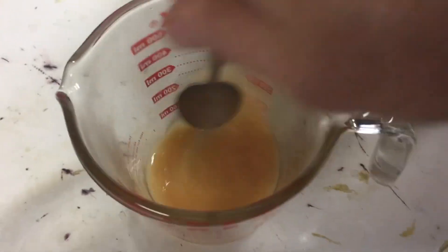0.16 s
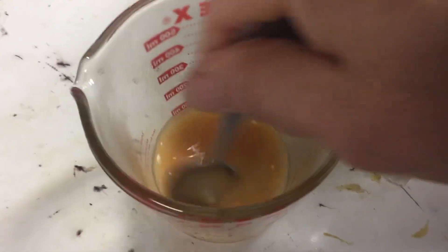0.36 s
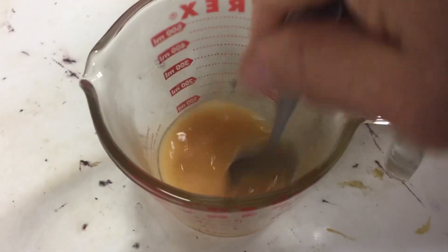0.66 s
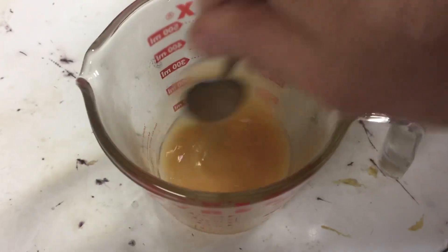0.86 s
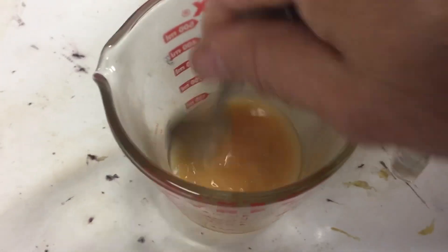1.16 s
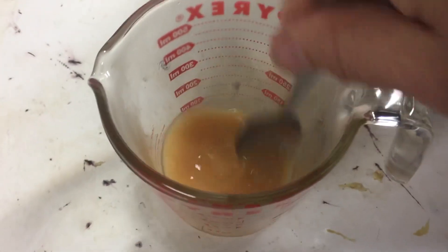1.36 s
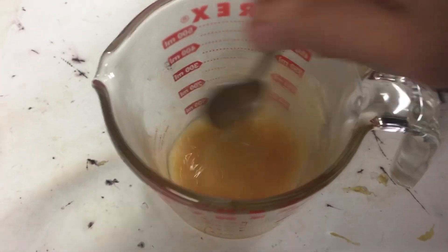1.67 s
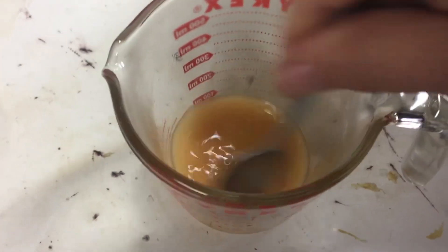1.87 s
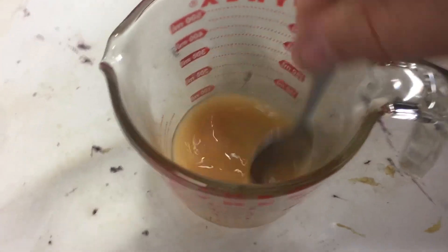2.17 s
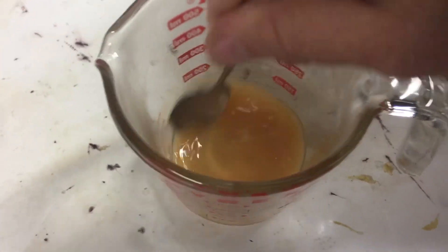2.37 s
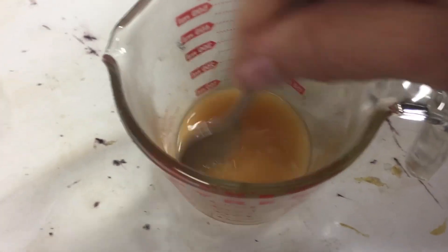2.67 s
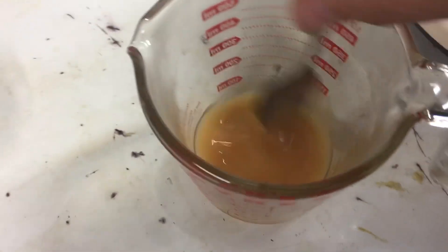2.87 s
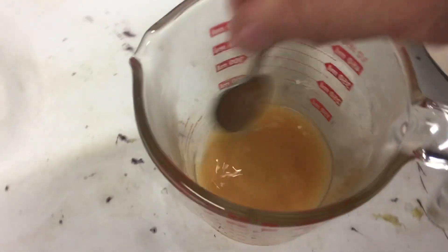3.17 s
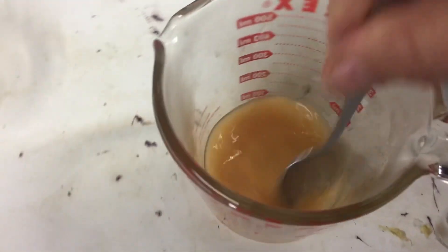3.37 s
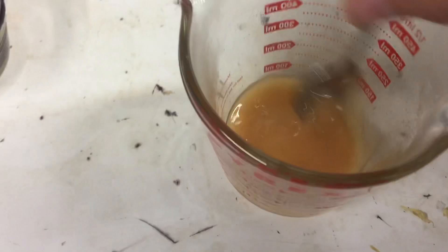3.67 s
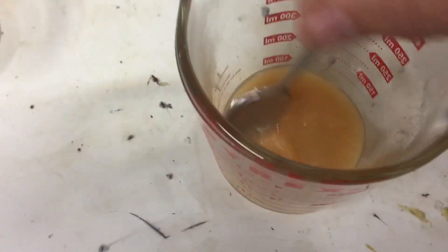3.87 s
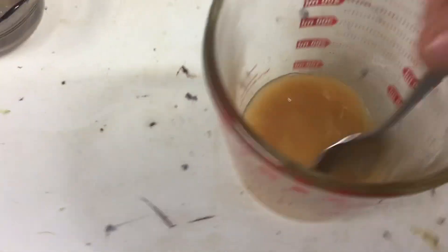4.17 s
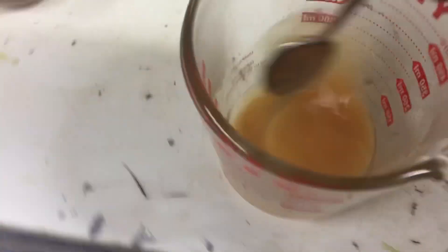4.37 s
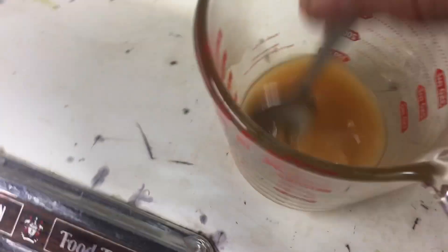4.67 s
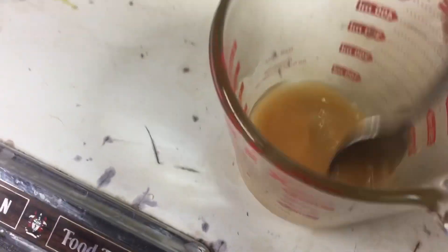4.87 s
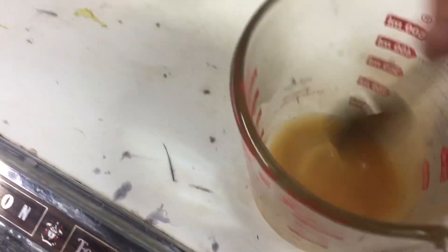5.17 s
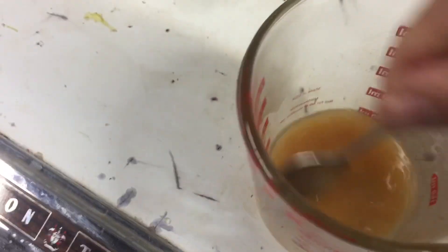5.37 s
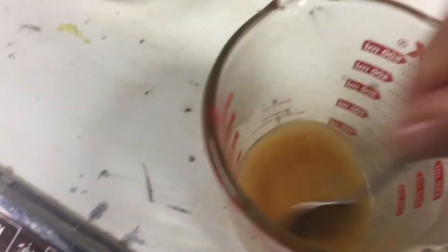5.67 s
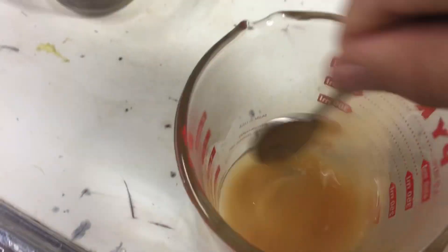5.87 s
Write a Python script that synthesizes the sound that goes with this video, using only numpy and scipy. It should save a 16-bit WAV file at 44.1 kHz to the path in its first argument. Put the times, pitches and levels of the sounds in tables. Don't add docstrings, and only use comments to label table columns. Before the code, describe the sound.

Fast, uneven spoon knocks rattle around a glass measuring cup holding a little syrupy liquid, with short rings, gritty scrapes and faint bubble pops.

```python
import sys
import numpy as np
from scipy import signal
from scipy.fft import rfft, irfft
from scipy.io import wavfile
from scipy.ndimage import uniform_filter1d, map_coordinates

SR = 44100
rng = np.random.default_rng(int(sys.argv[2]) if len(sys.argv) > 2 else 0)


def field_ratio(decibels):
    return 10 ** (np.asarray(decibels, dtype=float) / 20)


def persist_wave(psi):
    counts = np.round(np.clip(psi, -1, 1) * 32767).astype(np.int16)
    wavfile.write(sys.argv[1], SR, np.atleast_2d(counts).T)


N = 265031

# (pitch [Hz], level against the knock, above 4500 Hz against its crack [dB])
MODES = [(1175, -50), (1292, -45), (1701, -42), (2250, -38), (3163, -38), (3680, -39), (4190, -41),
         (4982, -30), (6205, -31), (7262, -28), (7472, -26), (7810, -26), (8025, -26), (9605, -32),
         (10468, -30), (11300, -32), (12670, -35), (14200, -32), (14578, -32)]
# (time [s], peak [dB], clunk pitch [Hz], crack against peak [dB], time for the clunk to fall 60 dB [s])
FAR_WALL = [(0.0348, 1.5, 2770, -20.5, 0.027), (0.416, 3.5, 2890, -26, 0.0086),
            (0.7972, -11.5, 3250, -20.5, 0.046), (1.1341, 3, 2660, -15.5, 0.015),
            (1.5331, 4.5, 2750, -17.5, 0.01), (1.919, -1.5, 3080, -23, 0.026),
            (2.2951, 4, 2900, -17, 0.019), (2.6537, 4, 3270, -23.5, 0.019),
            (3.1218, -45, 2500, -5.5, 0.028), (3.4162, -4, 2950, -16, 0.033),
            (3.7838, -26.5, 2660, -20, 0.069), (4.2493, -11.5, 3070, -12.5, 0.045),
            (4.6352, -8.5, 2690, -16, 0.048), (4.9831, -5.5, 2730, -6, 0.051),
            (5.3563, 0.5, 3440, -12, 0.019), (5.7392, 4, 3260, -8.5, 0.023)]
SIDE_WALL = [(0.0956, -2, 3107, -8, 0.043), (0.4777, -2, 3580, -11, 0.021), (0.8469, 3.5, 2964, -14, 0.015),
             (1.219, 2.5, 3340, -11.5, 0.015), (1.6154, -2.5, 2290, -4.5, 0.037),
             (2.014, 2, 2450, -4.5, 0.038), (2.353, 1, 3150, -6.5, 0.03), (2.7307, 3.5, 3040, -11.5, 0.024),
             (3.145, 3, 2610, -5, 0.07), (3.5197, 2, 2435, -8.5, 0.029), (3.9563, 7.5, 2533, -10.5, 0.025),
             (4.3286, -1, 3006, -4.5, 0.047), (4.6863, 2.5, 2910, -10, 0.026),
             (5.064, -2.5, 3430, -18, 0.017), (5.4224, 2.5, 4360, -18.5, 0.0064),
             (5.8, -6, 2860, -12, 0.031)]
BOTTOM = [(0.2632, -39, 3160, -27.5, 0.032), (0.641, -7.5, 2550, -18.5, 0.01),
          (0.9549, -4.5, 1900, -15, 0.0056), (1.31, -3, 3170, -20.5, 0.014),
          (1.7607, -7, 2870, -20.5, 0.032), (2.1414, -7, 2370, -18.5, 0.017),
          (2.528, -4.5, 2560, -6.5, 0.05), (2.933, -15, 2900, -27, 0.0092), (3.2467, -30, 1980, -4, 0.051),
          (3.6746, -1.5, 3240, -19, 0.0071), (4.0719, -4, 3070, -18.5, 0.0062),
          (4.488, -4.5, 3280, -16.5, 0.023), (4.8338, 4, 2510, -6, 0.031),
          (5.1986, -13, 1860, -32.5, 0.0041), (5.575, -4, 3770, -15.5, 0.0097),
          (5.9206, -3, 3220, -14.5, 0.01)]


def rms_one(x):
    return x / np.sqrt(np.mean(x ** 2) + 1e-20)


def in_time(rows):
    s, *columns = np.transpose(rows)
    return [np.interp(np.arange(N) / SR, s, column) for column in columns]


def drift(rate):
    knots = rng.standard_normal(4000)
    return map_coordinates(knots, [np.arange(N) * 2 * rate / SR], order=3)


def shaped(spectrum):
    hz, level_db = np.transpose(spectrum)
    grid = np.fft.rfftfreq(N, 1 / SR) + 1
    gain = field_ratio(np.interp(np.log(grid), np.log(hz), level_db, left=-90, right=-90))
    return rms_one(irfft(rfft(rng.standard_normal(N)) * gain, N))


def ring(force, hz, t60):
    r, w = field_ratio(-60 / (t60 * SR)), 2 * np.pi * hz / SR
    return signal.lfilter([0, np.sin(w)], [1, -2 * r * np.cos(w), r * r], force + 1e-18)


def cluster(hz, level_db, t60, t):
    t = t[:, None]
    x = np.sum(field_ratio(level_db - 60 * t / t60) * np.sin(2 * np.pi * hz * t), axis=1)
    return x / np.abs(x).max()


def lifetime(hz):
    sunk = .7 if 2000 < hz < 2500 else 1
    return max(.29 * (hz / 1700) ** -.62, .125) * sunk


def all_knocks():
    # (first [Hz], second [Hz], second against first [dB], third [Hz], third against first [dB])
    far_tones = [(2850.0, 2540.0, -2, 3080.0, -8), (2860.0, 2490.0, -5, 3110.0, -5),
                 (3030.0, 2630.0, -5, 1510.0, -8), (2630.0, 3410.0, -1, 1670.0, -5),
                 (2680.0, 2990.0, -4, 3420.0, -5), (3050.0, 1520.0, -11, 3540.0, -13),
                 (2900.0, 3480.0, -2, 3120.0, -3), (2950.0, 3450.0, 0, 3190.0, -4),
                 (2440.0, 2720.0, -3, 2120.0, -6), (2940.0, 2680.0, -8, 3950.0, -7),
                 (2680.0, 2130.0, -6, 4180.0, -8), (3010.0, 2580.0, -4, 1780.0, -9),
                 (2920.0, 2350.0, -6, 1810.0, -10), (2860.0, 1880.0, -9, 1620.0, -6),
                 (3210.0, 2290.0, -5, 2910.0, -6), (2520.0, 3950.0, -1, 2770.0, -1)]
    side_tones = [(3030.0, 2240.0, -4, 1840.0, -4), (3550.0, 2220.0, -2, 3020.0, -2),
                  (2930.0, 3600.0, -6, 3290.0, -7), (3000.0, 3540.0, 0, 3320.0, -4),
                  (2190.0, 3660.0, -5, 2900.0, -6), (2510.0, 3680.0, -4, 2190.0, -4),
                  (3070.0, 3700.0, -3, 2830.0, -5), (2830.0, 3060.0, -2, 2190.0, -3),
                  (2580.0, 2310.0, -7, 3690.0, -13), (2610.0, 2940.0, -3, 1500.0, -4),
                  (2520.0, 2260.0, -2, 2750.0, -4), (2410.0, 3170.0, 0, 1860.0, -4),
                  (2840.0, 3190.0, -1, 3540.0, -1), (3490.0, 2850.0, -3, 3170.0, -3),
                  (2660.0, 4160.0, -1, 3670.0, -1), (2960.0, 1600.0, -1, 2400.0, -6)]
    bottom_tones = [(3260.0, 1330.0, -1, 2570.0, -1), (2520.0, 2830.0, -7, 3150.0, -9),
                    (2780.0, 1680.0, -1, 1960.0, -4), (2780.0, 3960.0, -4, 3150.0, -5),
                    (2890.0, 3180.0, -5, 2490.0, -11), (2540.0, 1880.0, -2, 3260.0, -3),
                    (2450.0, 3240.0, -1, 2230.0, -7), (3210.0, 2520.0, 0, 3800.0, -4),
                    (1710.0, 2200.0, -2, 4550.0, -5), (2750.0, 3950.0, -5, 1810.0, -5),
                    (2960.0, 2530.0, -2, 2050.0, -5), (3180.0, 4050.0, -8, 2960.0, -8),
                    (2470.0, 3270.0, -2, 2980.0, -5), (2470.0, 1860.0, 0, 3390.0, -1),
                    (3280.0, 1920.0, -1, 3810.0, -3), (3050.0, 2740.0, -1, 3390.0, -2)]
    # (time [s], peak
    # [dB], clunk pitch [Hz], crack against peak [dB])
    grazes = [(0.0383, -16.5, 2700, -28.5), (0.6061, -16.5, 1930, -34), (0.985, -5, 2730, -32),
              (1.117, -25, 2040, -19), (1.3716, -10.5, 2580, -26.5), (1.518, -18.5, 3090, -29.5),
              (1.6916, -33.5, 1330, -24), (1.705, -25.5, 1610, -29.5), (1.8918, -30.5, 2820, -8),
              (1.989, -23, 3320, -25.5), (2.0385, -12.5, 1960, -25), (2.1502, -11, 2890, -13.5),
              (3.2905, -49.5, 1730, 9), (3.663, -41.5, 3520, -17.5), (5.332, -28, 3480, -28),
              (5.909, -34, 2170, -32), (3.9333, -34.5, 2400, -8.5), (4.1983, -31, 2130, -10.5),
              (4.2135, -17, 3050, -17), (4.2572, -6.5, 2880, -59), (4.454, -12, 2320, -58.5),
              (4.8055, -31.5, 1720, -9.5), (4.8435, -6, 2940, -35.5), (4.8512, 0, 3050, -14),
              (4.966, -27, 1620, -24.5), (5.0704, -5, 3380, -33.5), (5.0955, -7.5, 2960, -11.5),
              (5.1868, -28, 1820, -55), (5.34, -28, 1820, -28), (5.5642, -23, 1720, -32),
              (5.722, -20, 3220, -17)]
    ticks = [(0.2976, -49.5, 2610, -5.5), (0.3356, -40.5, 2820, -43), (0.359, -36, 2840, -33),
             (0.742, -29.5, 3020, -37), (0.8091, -38, 1500, -1.5), (1.0745, -49.5, 1710, 4.5),
             (1.8667, -35, 2030, -16), (2.1964, -53.5, 1680, 10.5), (3.3672, -45, 1700, 1.5),
             (3.7174, -28, 1970, -38), (3.8696, -48, 1940, -17), (4.1609, -42, 3200, 1.5),
             (5.241, -33, 3070, -9), (5.691, -36.5, 2760, -8), (5.9793, -34, 3280, -17)]
    rows = []
    for table, tones, hollow_db in ((FAR_WALL, far_tones, -29.5), (SIDE_WALL, side_tones, -35),
                                    (BOTTOM, bottom_tones, -18)):
        for (s, peak_db, hz, crack_db, t60), three in zip(table, tones):
            rows.append((s, peak_db, hz, crack_db, hollow_db, t60, *three))
    for s, peak_db, hz, crack_db in list(grazes) + list(ticks):
        rows.append((s, peak_db, hz, crack_db, -22, .018, hz, 1.13 * hz, -7, .85 * hz, -9))
    return np.array(rows)


def knock_samples(rows):
    return (rows[:, 0] * SR).astype(int)


def room_rumble():
    # (pitch [Hz], level per Hz [dB])
    rumble = [(25, -27), (60, -2.5), (105, 7), (150, -3.5), (200, 4.5), (300, -4), (520, -10.5), (800, -48)]
    fade_db = .35 * (-1 - np.arange(N) / SR)
    return field_ratio(-56 + fade_db + 2.2 * drift(4)) * shaped(rumble)


def gritty(grain_db):
    return rms_one(rng.standard_normal(N) * field_ratio(grain_db * drift(130) + drift(2.5)))


def scrape(pitches_hz, t60, patchy_db):
    force = gritty(grain_db=4.5)
    x = np.zeros(N)
    for k, hz in enumerate(pitches_hz):
        x += field_ratio(patchy_db * drift(7)) * ring(force, hz, t60) * (-1) ** k
    return x / np.sqrt(uniform_filter1d(x ** 2, size=3000) + 1e-12)


def wet_rubbing():
    # (pitch [Hz], level per Hz [dB])
    haze_spectrum = [(900, -22), (1350, -5), (2500, 0), (4100, -6), (5000, -16)]
    return scrape(np.geomspace(1301, 4050, num=14), 0.031, patchy_db=8.5), shaped(haze_spectrum)


def bare_rubbing():
    # (pitch [Hz], level per Hz [dB])
    hiss_spectrum = [(4200, 0), (5800, -5), (7800, 1), (10000, -6), (15700, -9)]
    bare = scrape([hz for hz, _ in MODES if hz > 4500], 0.04, patchy_db=9.0)
    low_pass = signal.butter(6, 14800, fs=SR, output="sos")
    return bare, signal.sosfilt(low_pass, shaped(hiss_spectrum))


def sliding():
    # (place [0 far wall, 1 side wall, 2 bottom, 3 far wall again], body [dB], hiss [dB])
    sweep = [
        (0, -56.5, -65),
        (.85, -46, -80.5),
        (1.5, -47.5, -65.5),
        (1.9, -53.5, -71.5),
        (2.1, -48.5, -71.5),
        (2.55, -52, -50),
        (2.898, -48, -57.5),
        (3, -41, -81.5),
    ]
    # (time [s], pressure [dB], hiss [dB])
    pressure = [(0, -5, -8), (.35, 3, -1.5), (.7, -7.5, -11), (1.05, 4, -10), (1.3, -5, -10.5),
                (1.65, 7.5, 1.5), (2, -1.5, -9.5), (2.35, -0.5, -12.5), (2.65, 0.5, -4), (2.95, -0.5, 2),
                (3.3, -7, -11), (3.6, 2.5, 5.5), (4.05, -2.5, -14), (4.3, 4, 2), (4.75, 6.5, -8),
                (5.27, -1, 1), (5.45, 0.5, 1), (6.01, 6, 1.5)]
    turn_s = 0.36
    s = np.transpose([np.array(table)[:, 0] for table in (FAR_WALL, SIDE_WALL, BOTTOM)]).ravel()
    s = np.r_[s[2] - turn_s, s, s[-3] + turn_s]
    place = np.interp(np.arange(N) / SR, s, np.arange(len(s)) - 1) % 3
    spot, body_db, hiss_db = np.transpose(sweep)
    pressure_db, bare_db = in_time(pressure)
    return np.interp(place, spot, body_db) + pressure_db, np.interp(place, spot, hiss_db) + bare_db


def slide(body_db, hiss_db, wet, haze, bare, air):
    body = field_ratio(1.5) * wet + field_ratio(-12.5) * haze
    hiss = field_ratio(-10.5) * bare + field_ratio(-11.0) * air
    skips = field_ratio(3.6 * drift(11))
    return skips * (field_ratio(body_db - 2.5) * body + field_ratio(hiss_db + 3.5) * hiss)


def slosh():
    # (time [s], level [dB])
    swirl = [
        (0, -67),
        (3.35, -68),
        (3.55, -42),
        (3.7, -47.5),
        (3.85, -55),
        (4.2, -57.5),
        (4.8, -52),
        (5.2, -59.5),
        (6.01, -53),
    ]
    level_db, = in_time(swirl)
    wet = scrape(np.geomspace(520, 860, num=14), .02, patchy_db=2.5)
    return field_ratio(level_db - 3 + 3 * drift(14)) * wet


def knocks():
    length = 4000
    out, t = np.zeros(N + length), np.arange(length) / SR
    chance = rng.standard_normal
    for s, peak_db, hz, bright_db, hollow_db, t60, *tones in all_knocks():
        first_hz, second_hz, second_db, third_hz, third_db = tones
        offset = .25 * chance(6)
        fill_db = -10 + 3 * chance(6) - 25 * abs(offset)
        body_hz = np.r_[first_hz, second_hz, third_hz, hz * np.exp(offset)]
        body_t60 = np.clip(t60, .012, .1) * np.exp(.15 * chance(9))
        body = cluster(body_hz, np.r_[0, second_db, third_db, fill_db], body_t60, t)
        after_hz = np.geomspace(1400, 4500, 24) * np.exp(.025 * chance(24))
        body += field_ratio(-13) * cluster(after_hz, 6 * chance(24), 0.077 * np.exp(.2 * chance(24)), t)
        body *= 1 - np.exp(-t / .0004)
        rebound = round(.0037 * SR * np.exp(.15 * chance()))
        body = .85 * (body + .39 * np.r_[np.zeros(rebound), body[:-rebound]])
        crack_hz = np.geomspace(4600, 14800, 40) * np.exp(.015 * chance(40))
        crack = cluster(crack_hz, 6 * chance(40), .01 * np.exp(.5 * chance(40)), t)
        crack *= 0.43 + 0.47 * np.exp(-t / 0.031)
        hollow = cluster(838 * np.exp(0.069 * chance(4)), 3 * chance(4), 0.075, t)
        mix = field_ratio(8.5) * body + field_ratio(bright_db + 14) * crack + field_ratio(hollow_db - 3) * hollow
        at = round((s - .0003) * SR)
        out[at:at + length] += field_ratio(peak_db) * mix
    return out[:N]


def rings():
    # (time [s], pitch [Hz], level [dB])
    chimes = [(0.0345, 4985, -33), (0.095, 1701, -30), (0.095, 4190, -31), (0.095, 4985, -34),
              (0.477, 4190, -33), (0.641, 1701, -33), (0.846, 4190, -34), (0.846, 4985, -27),
              (0.9555, 1701, -18), (0.9858, 1701, -26), (0.9858, 3680, -31), (1.134, 1701, -22),
              (1.2188, 4190, -26), (1.2188, 4985, -32), (1.311, 1701, -31), (1.533, 1701, -32),
              (1.533, 3680, -28), (1.615, 1701, -23), (1.615, 4190, -22), (3.1446, 1175, -38),
              (1.9186, 1520, -34), (2.0136, 1701, -19), (2.0136, 2440, -23), (2.0136, 3680, -24),
              (2.0136, 4190, -22), (2.14, 1701, -30), (2.295, 3680, -24), (2.3528, 1292, -33),
              (2.3528, 4190, -27), (3.1446, 1292, -36), (2.7304, 1292, -33), (2.7304, 2250, -27),
              (4.3282, 3680, -30), (2.7304, 4190, -31), (2.7304, 4985, -29), (2.528, 4985, -36),
              (3.1446, 1701, -16), (3.1446, 3680, -27), (3.1446, 4190, -26), (3.5193, 1292, -32),
              (3.5193, 3680, -27), (3.6743, 4985, -36), (3.9555, 1292, -28), (3.9555, 1690, -17),
              (3.9555, 2250, -16), (3.9555, 3680, -25), (4.6354, 1701, -34), (4.6354, 4190, -33),
              (5.0955, 3680, -39), (4.6854, 2250, -28), (4.6854, 3680, -25), (4.983, 3680, -26),
              (5.356, 3680, -27), (5.356, 4190, -28), (5.4232, 3680, -29), (5.4232, 4190, -21),
              (5.7394, 1701, -28), (5.7394, 3680, -21), (5.7995, 3680, -26), (5.9206, 4190, -33)]
    glints = [(0.095, 10466, -37), (0.095, 14578, -34), (0.846, 7810, -33), (0.846, 14578, -28),
              (1.134, 11210, -30), (1.2188, 10466, -28), (1.2188, 14578, -24), (1.615, 7810, -24),
              (1.615, 9610, -31), (1.615, 10466, -33), (2.0136, 7262, -31), (2.0136, 7810, -31),
              (2.0136, 8020, -27), (2.0136, 10466, -23), (2.0136, 14578, -28), (2.295, 6225, -37),
              (2.295, 7262, -34), (2.3528, 6225, -37), (2.3528, 7262, -32), (2.3528, 7810, -26),
              (2.3528, 9610, -32), (2.3528, 10466, -23), (2.3528, 11400, -32), (2.7304, 7262, -30),
              (2.7304, 7472, -20), (2.7304, 9610, -34), (2.7304, 10466, -24), (2.7304, 11400, -33),
              (3.1446, 10466, -30), (3.1446, 14578, -15), (3.5193, 7262, -28), (3.5193, 8020, -24),
              (3.5193, 9610, -24), (3.5193, 10466, -28), (3.9555, 8020, -28), (3.9555, 14578, -27),
              (4.3282, 7472, -25), (4.3282, 9610, -32), (4.3282, 10466, -28), (4.3282, 11210, -25),
              (4.3282, 14578, -26), (4.6354, 7262, -28), (4.6854, 6225, -36), (4.6854, 7262, -31),
              (4.6854, 7810, -31), (4.6854, 9610, -21), (4.6854, 10466, -36), (4.983, 7262, -21),
              (5.356, 7262, -22), (5.356, 7472, -36), (5.356, 8020, -39), (5.4232, 7262, -31),
              (5.4232, 7472, -36), (5.5758, 6225, -46), (5.7394, 7262, -20), (5.7995, 7262, -36)]
    # (time [s], level [dB])
    sings = [(0.0345, -22), (0.416, -21), (0.641, -40), (0.9555, -32), (1.134, -22), (1.2188, -34),
             (1.311, -33), (1.533, -18), (1.615, -31), (1.76, -28), (1.9186, -29), (2.0136, -23),
             (2.295, -21), (2.3528, -24), (2.6536, -31), (2.7304, -31), (3.1446, -18), (3.5193, -21),
             (3.9555, -9), (4.2557, -23), (4.3282, -15), (4.4886, -23), (4.6354, -27), (4.6854, -20),
             (4.8506, -18), (5.0955, -31), (5.356, -21), (5.4232, -26), (5.7394, -27), (5.7995, -24)]
    keenest_hz = 3163
    length = 14000
    out, t = np.zeros(N + length), np.arange(length) / SR
    landings = [k[0] for table in (FAR_WALL, SIDE_WALL, BOTTOM) for k in table if k[1] > -12]
    landings = np.array(landings + [N / SR])
    sung = [(s, keenest_hz, level_db) for s, level_db in sings]
    for s, hz, level_db in list(chimes) + list(glints) + sung:
        free_s = landings[landings > s + .01].min() - s
        wetting = 1 + 1.4 * t * (hz > 2000)
        fall_db = 60 * t / lifetime(hz) * wetting + 1.5 * np.sign(6000 - hz)
        fall_db += 900 * np.maximum(t - free_s, 0)
        beat = 1 + .3 * np.cos(2 * np.pi * 14 * hz / 3000 * rng.uniform(.5, 1.5) * t)
        bite = 1 + (hz > 6000) * np.exp(-t / .008)
        onset = 1 - np.exp(-t / .002)
        tone = np.sin(2 * np.pi * hz * t)
        out[round(s * SR):][:length] += beat * field_ratio(level_db - fall_db) * bite * onset * tone
    return out[:N]


def faint_rings(low_rub, high_rub):
    rows, out = all_knocks(), np.zeros(N)
    for hz, level_db in MODES:
        high = hz > 4500
        force = field_ratio(level_db + 2 + 7 * drift(8)) * (high_rub if high else low_rub)
        hit_db = rows[:, 1] + rows[:, 3] * high + level_db + 5 * rng.standard_normal(len(rows))
        force[knock_samples(rows)] += field_ratio(hit_db)
        out += ring(force, hz, .8 * lifetime(hz))
    return out


def wash(body, hiss):
    # (level against the knock, for the hiss against its crack [dB], time to fall 60 dB [s])
    body_tails = [
        (-18.5, 0.065),
        (-31, 0.2),
    ]
    hiss_tails = [
        (-3, 0.02),
        (-31, 0.2),
    ]
    rows, out = all_knocks(), np.zeros(N)
    peak_db = rows[:, 1]
    crack_db = peak_db + rows[:, 3]
    for murmur, level_db, tails in ((body, peak_db, body_tails), (hiss, crack_db, hiss_tails)):
        power, envelope = np.zeros(N), np.zeros(N)
        power[knock_samples(rows) + 40] = field_ratio(2 * level_db)
        for tail_db, t60 in tails:
            fade = field_ratio(-120 / (t60 * SR))
            envelope += field_ratio(2 * tail_db) * signal.lfilter([1], [1, -fade], power)
        out += np.sqrt(envelope) * murmur
    return out


def worktop_taps():
    rows, force = all_knocks(), np.zeros(N)
    force[knock_samples(rows)] = field_ratio(rows[:, 1] - 35)
    return ring(force, 220, .018)


def bubbles():
    # (time [s], peak [dB], starting pitch [Hz], rise per second [ratio], time to fall 60 dB [s])
    pops = [
        (1.422, -18, 3150, 12, .012),
        (3.256, -37, 2150, 4, .03),
        (4.72, -18, 2450, .1, .07),
        (4.882, -18, 1050, 24, .045),
        (5.985, -31, 800, 1, .06),
        (4.856, -22, 2000, .1, .06),
        (5.097, -21, 1500, .5, .045),
        (5.428, -24, 1500, .1, .07),
        (5.43, -25, 1950, 4, .07),
        (5.555, -34, 1850, 1.5, .2),
    ]
    length = 5000
    out, t = np.zeros(N + length), np.arange(length) / SR
    for s, peak_db, hz, rise, t60 in pops:
        swell = field_ratio(peak_db - 60 * t / t60) * (1 - np.exp(-t / .0012))
        out[round(s * SR):][:length] += swell * np.sin(2 * np.pi * hz * (t + rise * t * t / 2))
    return out[:N]


def jolts():
    # (time [s], peak [dB], starting pitch [Hz])
    thumps = [
        (2.013, -37, 148.5),
        (3.1477, -20.5, 253),
        (3.524, -45, 150),
        (3.958, -32.5, 210),
        (4.832, -35.5, 326),
        (5.739, -39, 264),
    ]
    length = 6000
    out, t = np.zeros(N + length), np.arange(length) / SR
    end_share, sag_s = 0.16, 0.007
    turns = end_share * t + (1 - end_share) * sag_s * (1 - np.exp(-t / sag_s))
    for s, peak_db, hz in thumps:
        swell = field_ratio(peak_db - 60 * t / 0.1) * (1 - np.exp(-t / 0.00066))
        out[round(s * SR):][:length] += swell * np.sin(2 * np.pi * hz * turns)
    return out[:N]


def scene():
    body_db, hiss_db = sliding()
    wet, haze = wet_rubbing()
    bare, air = bare_rubbing()
    low_rub = field_ratio(body_db - 12) * gritty(grain_db=4)
    high_rub = field_ratio(hiss_db - 14) * gritty(grain_db=4)
    struck = knocks() + rings() + faint_rings(low_rub, high_rub)
    struck += wash(field_ratio(-6.5) * wet + field_ratio(-5.5) * haze, field_ratio(-1.5) * bare + field_ratio(-3.0) * air)
    struck = signal.sosfilt(signal.butter(7, 690, "high", fs=SR, output="sos"), struck)
    rubbed = slide(body_db, hiss_db, wet, haze, bare, air) + slosh()
    return (room_rumble() + rubbed + struck + worktop_taps() + bubbles() + jolts())[None]


def top_cut(x):
    return signal.sosfilt(signal.butter(12, 16380, fs=SR, output="sos"), x)


def record(dry):
    overload = np.clip(dry, -1, 1) - dry
    overload = signal.sosfilt(signal.butter(1, 350, "high", fs=SR, output="sos"), overload)
    return top_cut(np.clip(dry + overload, -1, 1))


dry = scene()
out = record(dry)
persist_wave(out)
```